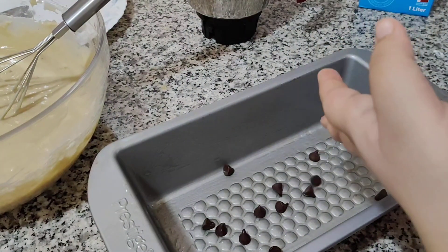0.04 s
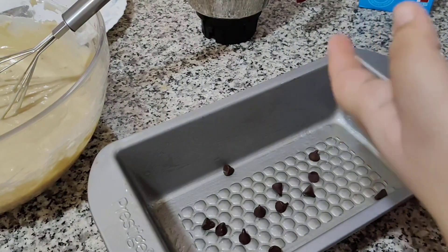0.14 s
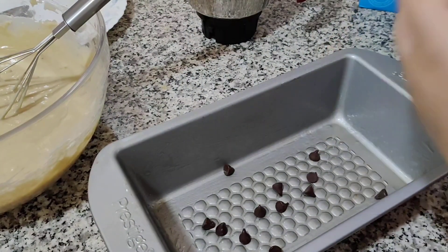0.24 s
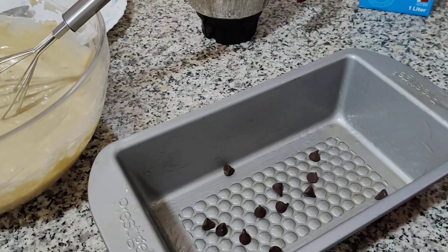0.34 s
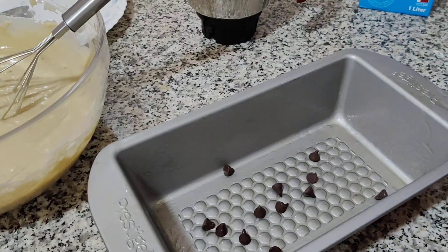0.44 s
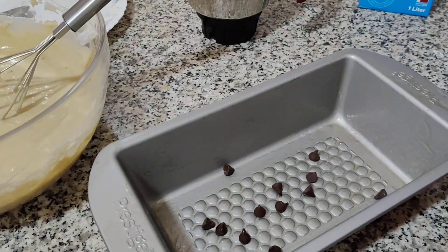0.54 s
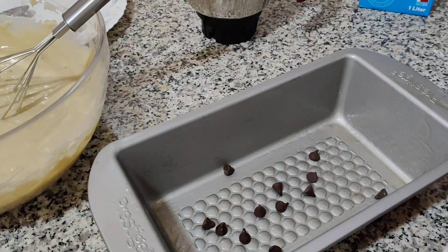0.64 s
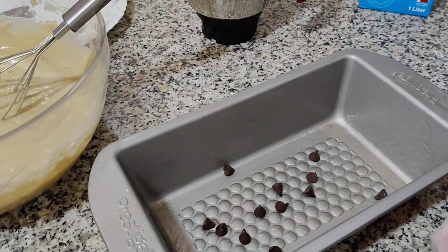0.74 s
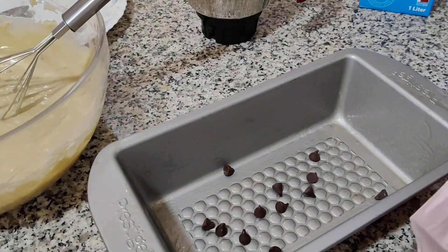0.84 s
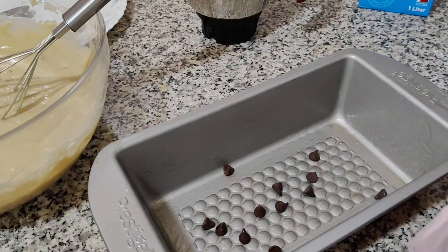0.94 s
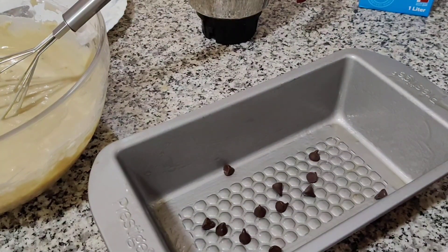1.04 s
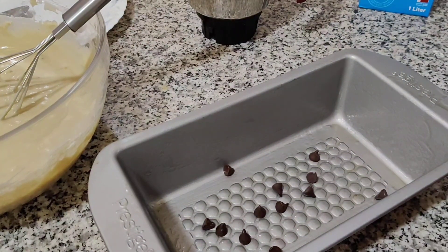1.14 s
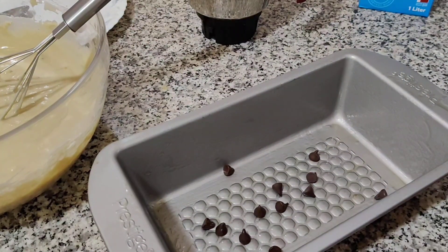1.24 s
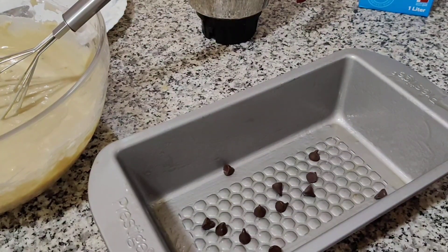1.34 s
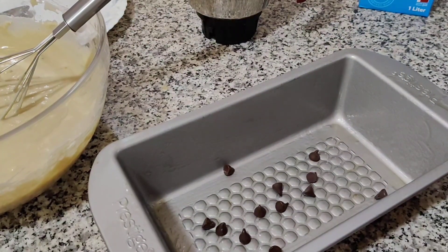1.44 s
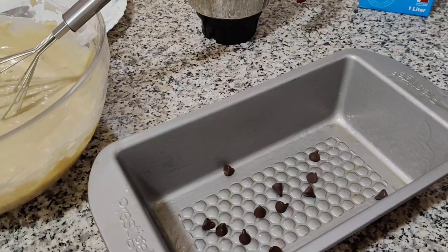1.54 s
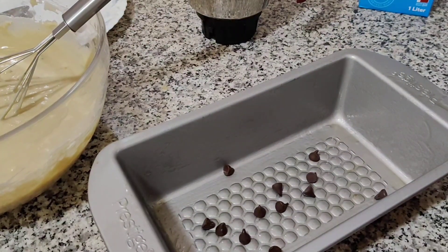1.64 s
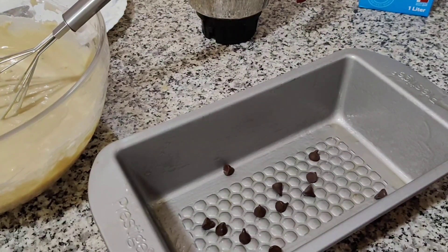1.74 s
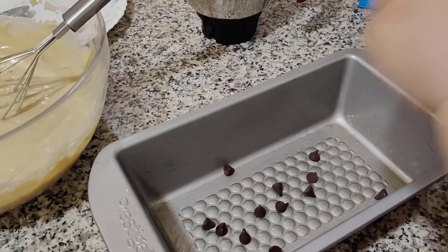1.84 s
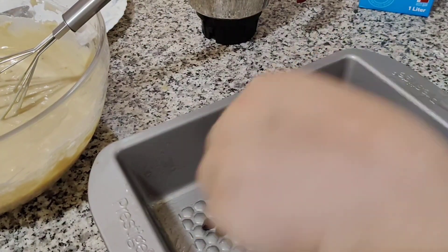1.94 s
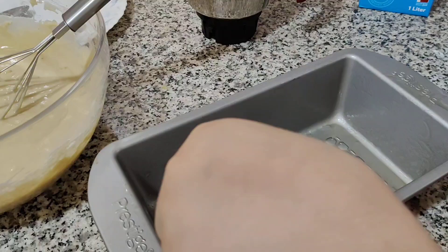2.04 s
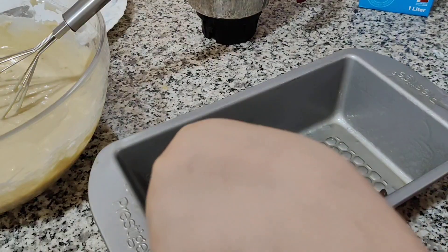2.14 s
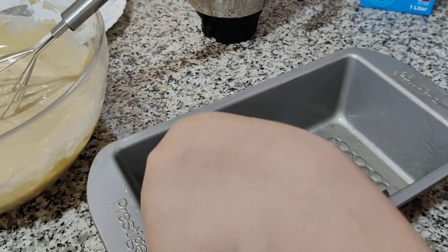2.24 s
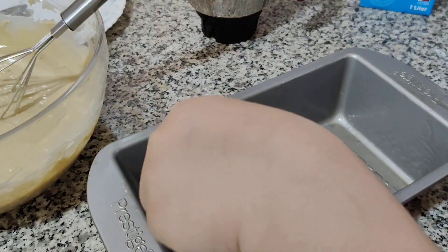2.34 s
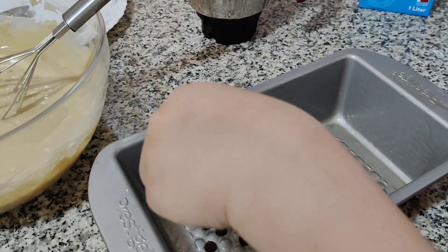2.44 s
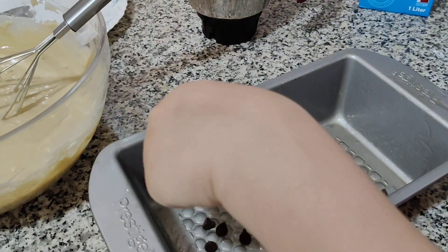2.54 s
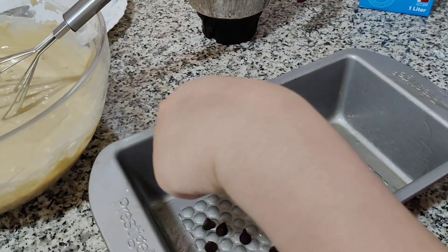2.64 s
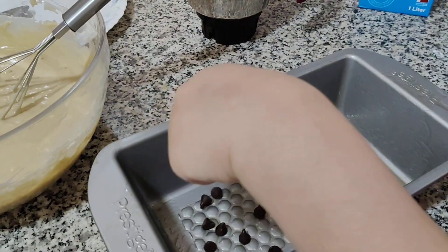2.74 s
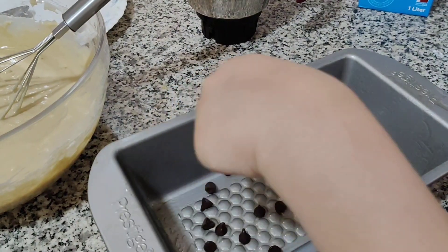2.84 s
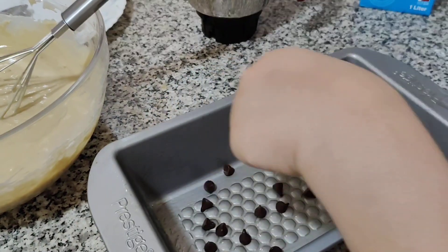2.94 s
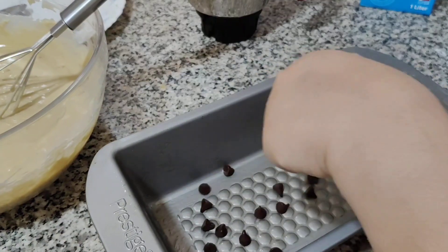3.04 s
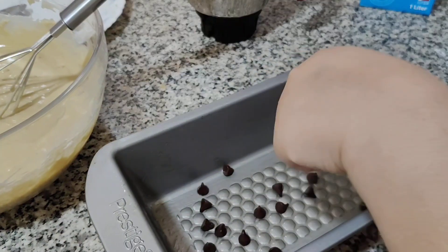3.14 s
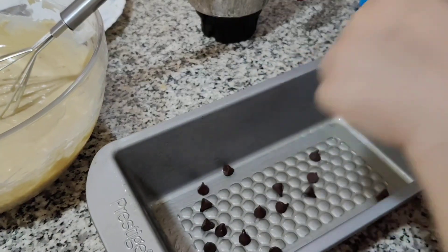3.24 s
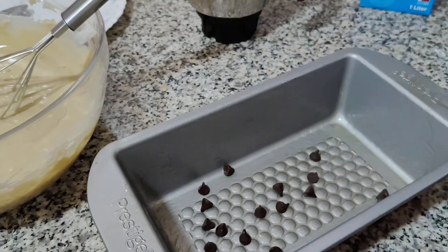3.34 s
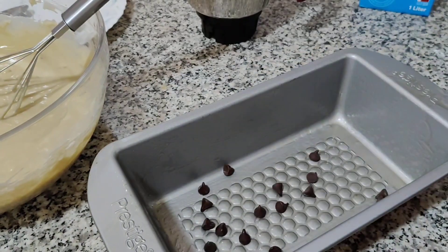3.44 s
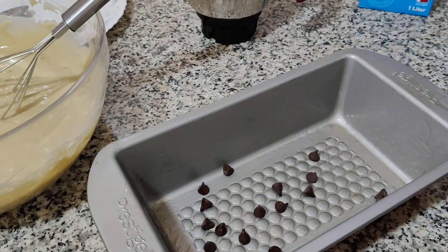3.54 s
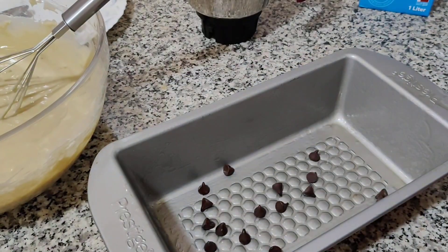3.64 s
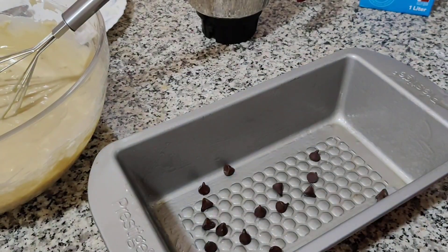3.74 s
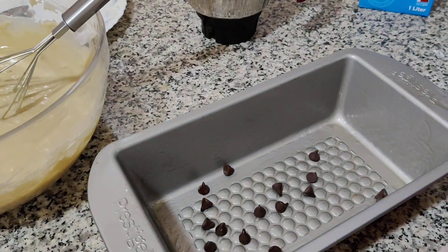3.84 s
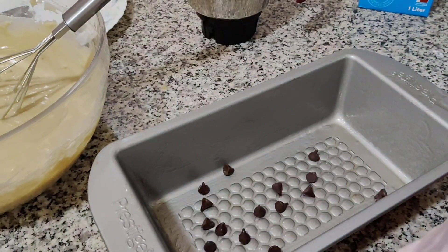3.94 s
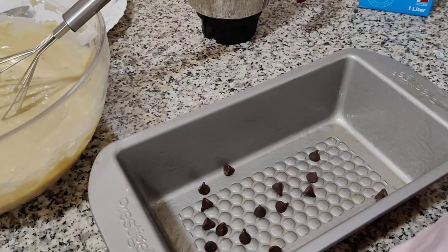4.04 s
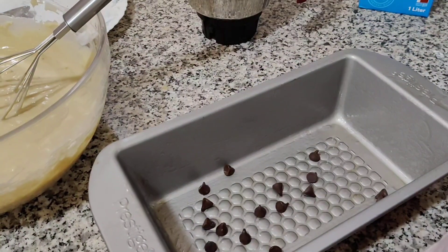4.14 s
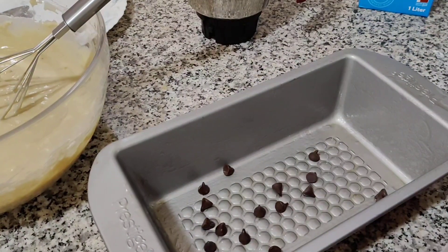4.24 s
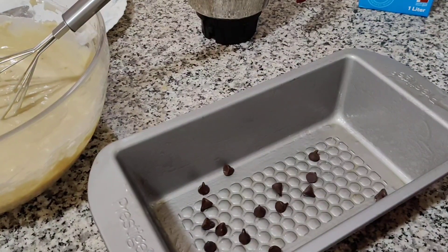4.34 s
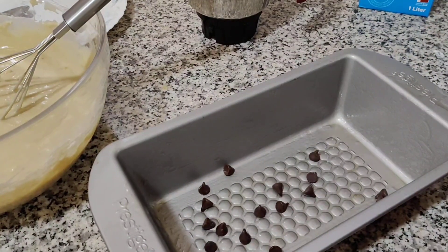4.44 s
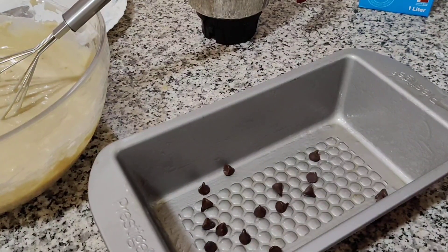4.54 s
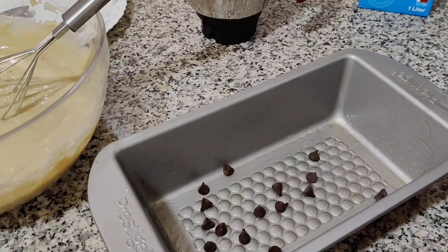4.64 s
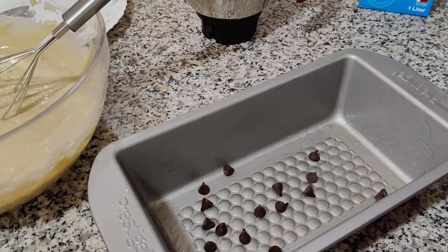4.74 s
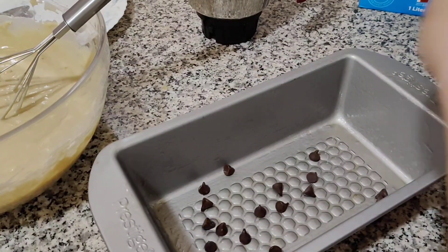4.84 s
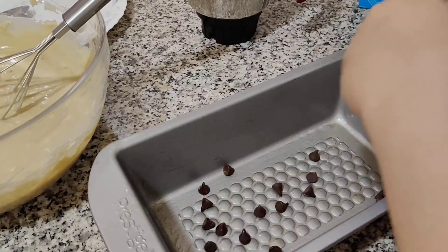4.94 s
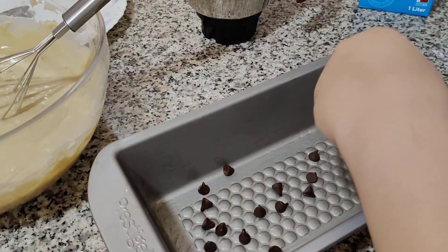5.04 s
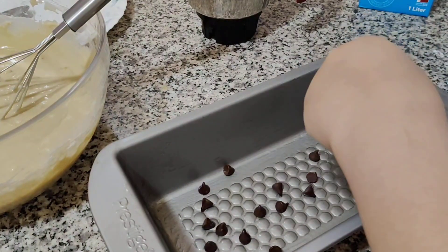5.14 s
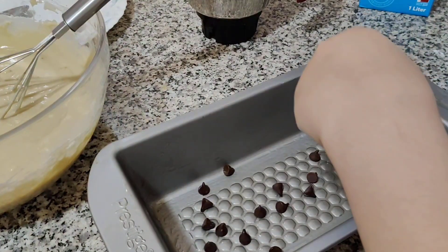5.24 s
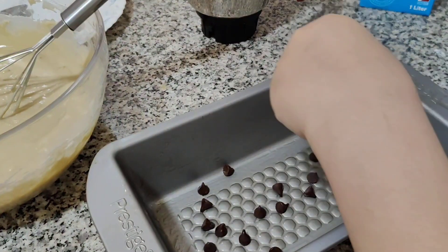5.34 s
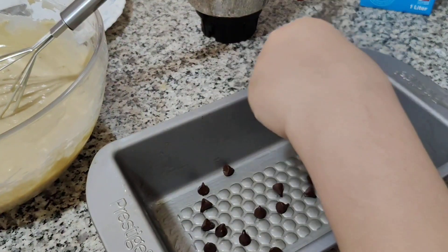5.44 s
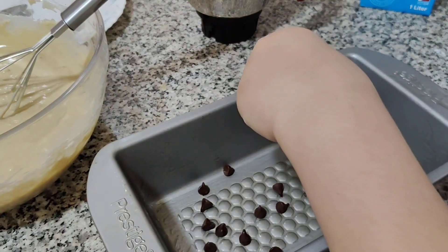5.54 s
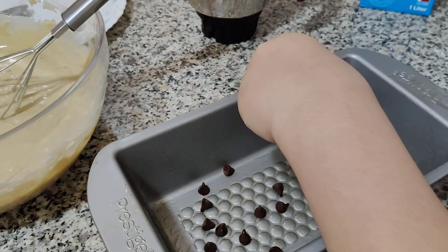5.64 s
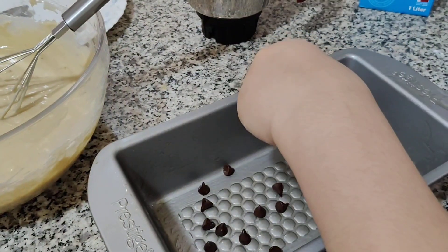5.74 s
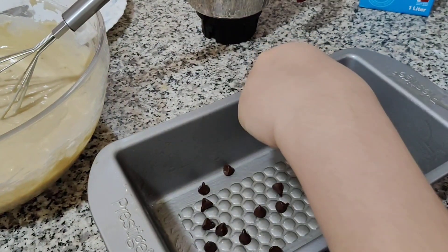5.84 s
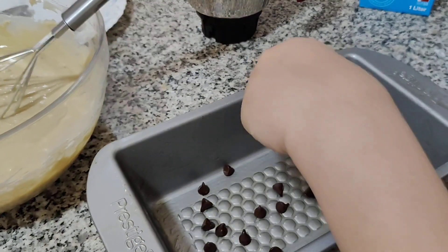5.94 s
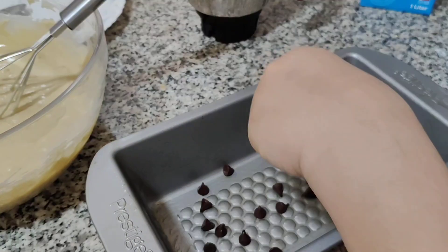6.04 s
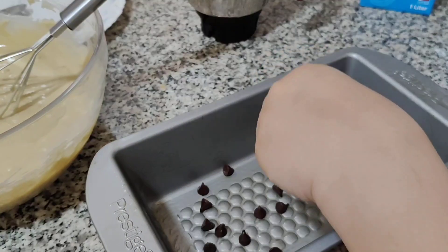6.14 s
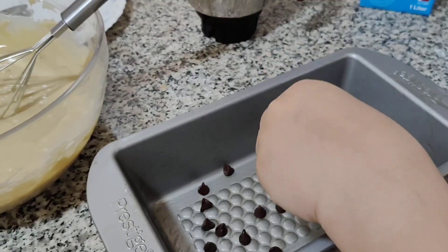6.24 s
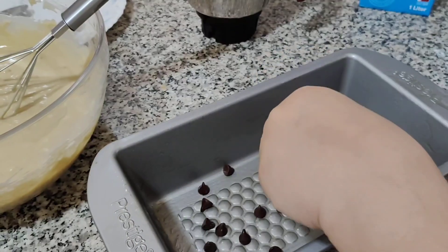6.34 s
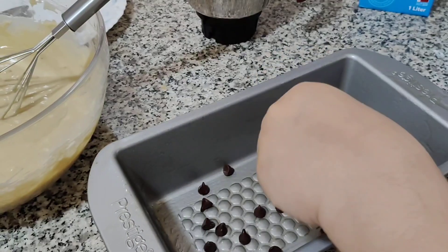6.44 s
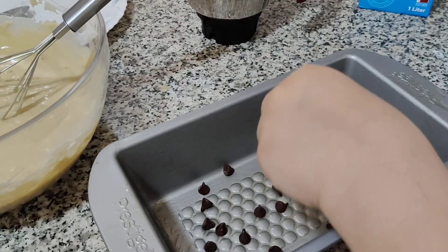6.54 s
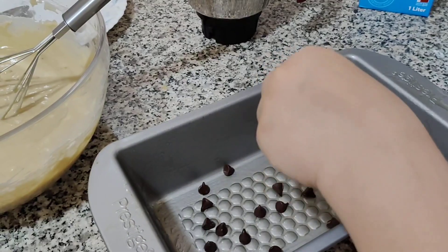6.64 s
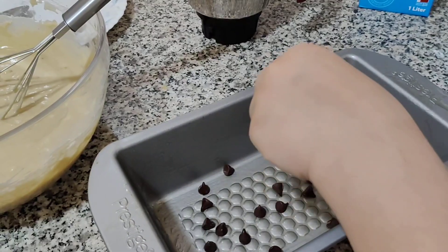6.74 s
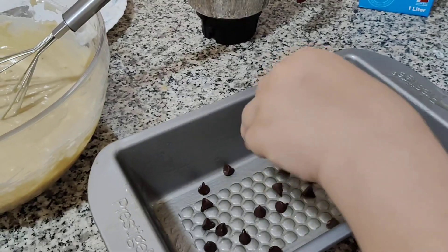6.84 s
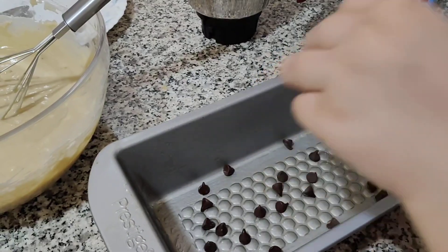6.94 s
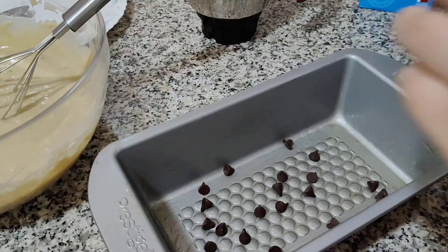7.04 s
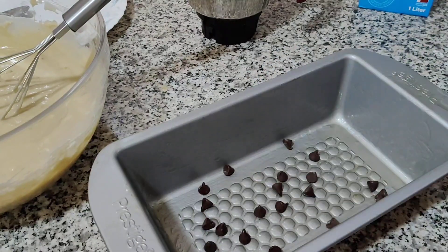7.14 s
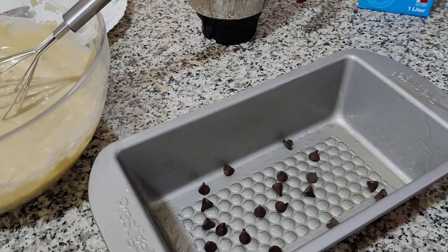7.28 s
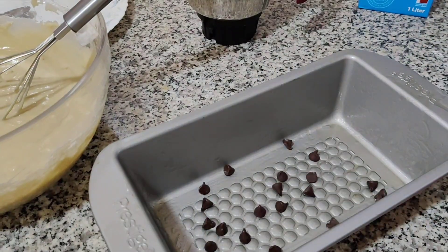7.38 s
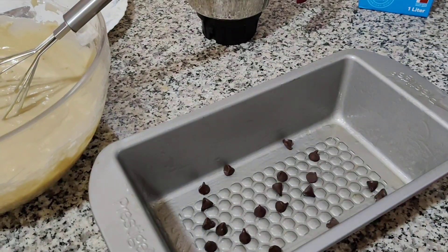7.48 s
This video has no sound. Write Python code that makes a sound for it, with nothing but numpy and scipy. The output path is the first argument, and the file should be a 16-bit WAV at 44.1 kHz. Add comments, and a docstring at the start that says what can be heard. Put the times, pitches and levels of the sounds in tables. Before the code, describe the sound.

Two rounds of thin plastic crinkling alternate with small hard pieces landing in a bare metal pan. The chips give sharp, dry, tinny clacks, some doubled by quick bounces, with a low thud as the pan rocks. The microphone is close, with a short lively small-room reverberation over soft air, faint hiss and appliance hum.

```python
"""A hand rummages in a plastic bag, then chocolate chips tick, bounce and ring in an empty metal loaf pan.
Chips are short clashes of coloured noise plus decaying sines; dull bumps are low sines as the pan rocks on stone.
The bag is coloured noise: sharp snaps, streams of tiny crackles and a soft rub over the counter.
A small kitchen answers the blows, over moving air, faint hiss and the hum of an appliance."""
import sys
import numpy as np
from scipy import signal
from scipy.fft import rfft, irfft, next_fast_len
from scipy.io import wavfile
from scipy.ndimage import map_coordinates

SR = 44100
rng = np.random.default_rng(int(sys.argv[2]) if len(sys.argv) > 2 else 0)


def waveform_to_disk(signal):
    """Save audio, clipped to [-1, 1], as 16-bit WAV at the path in sys.argv[1]."""
    frames = np.transpose(np.atleast_2d(signal))
    scaled = np.clip(frames, -1, 1) * 32767
    samples = np.round(scaled).astype(np.int16)
    wavfile.write(sys.argv[1], SR, samples)


N = 331191  # length in samples
T = np.arange(SR // 2) / SR  # time since a blow, s


# a chip meets the pan, levels before trims: start_s, clack_db, body_db (re clack), tick_db (re clack),
# left_right_db, spot_hz (resonance of the struck spot)
CHIP_CONTACTS = [(2.0581, -8.5, -12, -10.5, 5.5, 764), (2.5127, -15, -21, 2.5, -0.5, 3920),
                 (2.5158, -21.5, -23.5, -4, 4.5, 4100), (2.5448, -17.5, -21.5, -1.5, 3.5, 2890),
                 (2.5589, -19.5, -21.5, -10, 7, 2160), (2.599, -38.5, 6.5, -10, 1, 1310),
                 (2.626, -42.5, 4, -10, -1, 960), (2.955, -13.5, -14, -9.5, -11.5, 4270),
                 (2.96, -13.5, -15, -16.5, 18, 1790), (5.0102, -8, -12.5, -9.5, 0.5, 3020),
                 (5.543, -11.5, -14.5, -3, 2, 2630), (5.549, -19, -16.5, -1, 6.5, 1705),
                 (6.242, -15, -18.5, 1.5, 1.5, 4000), (6.2453, -13.5, -20, -4, -1, 2300),
                 (6.2677, -12.5, -16.5, -0.5, 0, 3240), (6.682, -8.5, -15, -8, -1.5, 695),
                 (6.6913, -19.5, -11.5, -4, -11, 2280)]
# the pan's short clash as the microphone hears it, dull around 6.6 kHz, as a spectral shape:
# pitch_hz, level_db (per Hz)
PAN_CLASH = [(250, -42.5), (570, -18.5), (750, -3.5), (1400, -7), (2300, 1), (4300, 0), (5300, -9),
             (6100, -14.5), (6600, -24), (7450, -2), (8600, 0), (11250, 0.5), (11800, -15.5), (14200, -29)]


def chips():
    """Each contact clashes the sheet, rings the pan and excites the room; soft flanks add body, hard tips tick."""
    out = np.zeros((2, N))
    for start_s, clack_db, body_db, tick_db, left_right_db, spot_hz in CHIP_CONTACTS:
        contact = [(1200, body_db + 16.5), (2600, 0), (5000, 0.0076),
                   (8000, tick_db + 9.5), (10500, tick_db + 4), (12500, 2 * tick_db + 12)]
        # one noise for the direct sound, another for the room
        sheet = np.array([noise(PAN_CLASH, len(T)), noise(PAN_CLASH, len(T))])
        sheet = rippled(coloured(sheet, contact), depth_db=4, spacing_hz=50)
        near, far = resonant(sheet, spot_hz, boost_db=2, q=22)
        crack = amp(6) * fade(T, .013)
        after_ring = amp(-13) * fade(T, 0.069)
        clash = near * (crack + after_ring)
        ring = amp(-23) * coloured(pan_ring(t60_at_khz=0.44, damping=.3, scatter_db=2), contact)
        room = amp(-4.5) * room_tail(far, build=0.0065)
        # the bending wave needs a moment to spread over the sheet
        onset = 1 - np.exp(-T / .0005)
        hit = panned(clash + ring, left_right_db) + room
        add(out, start_s, amp(clack_db - 1.5) * onset * hit)
    return out


# the pan's clearest modes, levels relative to each other: pitch_hz, level_db
PAN_CLEAR_MODES = [(755, -6.5), (940, -14.5), (1097, 1), (1139, 2), (1366, -3.5), (1660, -3.5), (1745, -10),
                   (2341, 0), (2480, -3.5), (2735, -13), (2897, -1), (3021, -20.5), (3106, -4),
                   (3301, -2.5), (3540, -8.5), (3810, -17.5), (4030, 0.5), (4248, 4.5), (4461, 0.5),
                   (4792, -2.5), (5776, -4.5), (7450, -10.5), (7860, -5.5), (8350, -2.5), (8589, -9.5),
                   (9430, -4), (9782, -10), (10594, -7.5), (11059, -4)]


def pan_ring(t60_at_khz, damping, scatter_db):
    """The clear modes: each landing wakes them at new strengths, and high ones die sooner."""
    hz, db = np.transpose(PAN_CLEAR_MODES)[:, :, None]
    khz = hz / 1000
    strength = amp(db - db.max() + scatter_db * rng.standard_normal((2, len(hz), 1)))
    phase = rng.uniform(0, 2 * np.pi, (2, len(hz), 1))
    decay = fade(T, t60_at_khz * khz ** -damping)
    return np.sum(strength * decay * np.sin(2 * np.pi * hz * T + phase), axis=1)


# dull bumps on the counter and the pan: start_s, level_db
DULL_BUMPS = [(1.126, -29.5), (3.0248, -10.5), (3.063, -24), (3.091, -28.5), (3.113, -34), (3.130, -43),
              (3.428, -24), (3.493, -35)]
# the whole pan on the stone: pitch_hz, level_db (re the bump), t60_s
PAN_ON_STONE = [(86, -28, 0.071), (139, -19, 0.054), (164, 4, 0.071), (190, -23, 0.052), (376, -24, 0.065),
                (741, -7.5, 0.056)]


def bumps():
    """Soft blows wake only the lowest modes; the pan rocks a few times before it settles."""
    out = np.zeros((2, N))
    modes = sum(amp(db) * fade(T, t60_s) * np.sin(2 * np.pi * hz * T) for hz, db, t60_s in PAN_ON_STONE)
    thump = modes * (1 - np.exp(-T / 0.002))
    boom = [(40, -29), (80, 3.0), (220, -6.5), (320, -23), (800, -19.5), (2000, -47), (6000, -94)]
    for start_s, level_db in DULL_BUMPS:
        room = amp(-3.5) * room_tail(noise(boom, len(T)), build=0.012)
        add(out, start_s, amp(level_db) * (thump + room))
    return out


# the bag snaps and is knocked about, levels before trims: start_s, peak_db, thud_db (re peak),
# crackle_db (re peak), fold_hz (resonance of the fold)
BAG_SNAPS = [(.340, -26.5, -22, -14.5, 4140), (.370, -22, -4, -22, 3120), (0.546, -15, -3.5, -15.5, 2800),
             (.556, -20.5, -11, -27, 1200), (0.657, -20, -4.5, -17, 2770), (.677, -14.5, -22, -31, 359),
             (.727, -17, -15, -33, 430), (0.9396, -18, -10.5, -26, 363), (0.974, -11.5, -21, -19, 3500),
             (1.06, -26.5, -11, -28, 2720), (1.123, -34.5, 2, -23, 740), (1.181, -27, -19, -27, 2620),
             (1.295, -15.5, -20, -21, 780), (1.335, -18, -19, -33, 410), (1.360, -15.5, -4, -20.5, 2750),
             (1.462, -18.5, -1, -44, 290), (1.602, -27.5, -1, -33, 1970), (1.783, -28, -1, -42, 765),
             (3.463, -19, -7, -14.5, 810), (3.496, -12, -6, -18, 277), (3.735, -21, -1, -34, 780),
             (4.169, -35.5, 10, -18, 760), (4.469, -17.5, -6.5, -39, 690)]
# plastic film as the microphone hears it, dull around 6.5 kHz, as a spectral shape for snaps and rustle:
# pitch_hz, level_db (per Hz)
BAG_FILM = [(120, -7.5), (280, 7), (800, 8), (1500, -0.5), (3200, -3.5), (4700, -6), (5600, -14),
            (6500, -19), (7800, -0.5), (11200, -8.5), (11900, -35.5), (14200, -32)]


def bag_snaps():
    """Folds of the bag buckle, each at its own pitch, and its load shifts; the room answers."""
    out = np.zeros((2, N))
    for start_s, peak_db, thud_db, crackle_db, fold_hz in BAG_SNAPS:
        fold = [(400, thud_db + 8.5), (900, 0), (4500, 0), (8000, crackle_db + 17.5)]
        film = np.array([noise(BAG_FILM, len(T)), noise(BAG_FILM, len(T))])
        film = rippled(coloured(film, fold), depth_db=2.5, spacing_hz=70)
        near, far = resonant(film, fold_hz, boost_db=8.0, q=4.9)
        decay = amp(-3) * fade(T, 0.011) + amp(-4) * fade(T, 0.069)
        onset = 1 - np.exp(-T / 0.00087)
        snap = near * decay * onset
        room = amp(-11.5) * room_tail(far, build=0.0037)
        add(out, start_s, amp(peak_db - 5.5) * (snap + room))
    return out


# the hand squeezes the bag, levels before trim: grip_s (firmest moment), crinkle_db, swell_s, release_t60_s
BAG_SQUEEZES = [(.35, -41, 0.028, 0.94), (.485, -36.5, .22, 0.46), (.71, -36.5, 0.18, 0.85),
                (1.0, -46, 0.055, 1), (1.25, -47.5, 0.38, 0.8), (1.375, -41, 0.23, 0.31),
                (1.58, -48.5, 0.027, 0.28), (1.815, -46, 0.079, 0.23), (3.472, -33.5, 0.086, 0.39),
                (3.735, -33, 0.44, 0.41), (3.89, -44, 0.049, 0.2), (4.2, -50.5, 0.85, 1),
                (4.47, -44, 0.25, 0.32)]


def bag_rustle(rate=800, spread_db=4.0):
    """Fingers crease the film: about rate tiny crackles a second, of very uneven size, blurred by the room."""
    grips = sum((amp(db) * stroke(grip_s, swell_s, release_t60_s)) ** 2
                for grip_s, db, swell_s, release_t60_s in BAG_SQUEEZES)
    level = np.sqrt(grips)
    sizes = amp(spread_db * np.minimum(rng.exponential(size=N), 3))
    creases = sizes * (rng.random(N) < rate / SR)
    # each crease leaves a quick crackle and a quieter room decay, summed as power
    blur = fade(T, .008) ** 2 + amp(-15) ** 2 * fade(T, .25) ** 2
    power = signal.fftconvolve(creases ** 2, blur)[:N]
    crackle = coloured(np.sqrt(np.abs(power)) * rng.standard_normal((2, N)), BAG_FILM)
    return amp(3) * level * unit(rippled(crackle, depth_db=2.5, spacing_hz=60))


# plastic rubbing on stone, as a spectral shape: pitch_hz, level_db (per Hz)
PLASTIC_RUB = [(400, -30), (900, 4.5), (1500, -4.5), (2300, -9), (3200, -25), (6000, -51)]


def bag_slide():
    """The bag is dragged a little way over the stone: a soft, dull rub, loudest when fastest."""
    return amp(-38) * stroke(s=4.01, swell=.25, release=0.23) * noise(PLASTIC_RUB, N)


# kitchen air, as a spectral shape: pitch_hz, level_db (per Hz)
KITCHEN_AIR = [(15, -54), (25, -17.5), (38, -15), (59, -13.5), (97, -3.5), (161, -16), (196, -1.5),
               (224, -23), (293, -5), (350, -10.5), (499, -10), (868, -20.5), (1290, -24), (1610, -34.5),
               (2200, -29.5), (5000, -51), (6500, -89), (11000, -120)]
# faint treble hiss, as a spectral shape: pitch_hz, level_db (per Hz)
FAINT_HISS = [(2940, -28), (5000, -6), (6580, -22.5), (8080, 5), (9180, -12), (11400, -18.5), (12100, -26),
              (13500, -35.5), (14900, -41.5)]
# appliance motor, levels before trim: pitch_hz, level_db (rms)
MOTOR_HUM = [(96.9, -45), (193.8, -52), (290.7, -51)]
AIR_DB, HISS_DB, HUM_TRIM_DB = -39.5, -67, -7.0


def background():
    """Moving air and faint hiss are shaped noise; the motor is sines with slightly unsteady level and phase."""
    t = np.arange(N) / SR
    hum = 0
    for hz, db in MOTOR_HUM:
        level = amp(db + HUM_TRIM_DB + 0.6 * wobble(4.9)) * np.sqrt(2)  # rms to peak
        hum = hum + level * np.sin(2 * np.pi * hz * t + .5 * wobble(3.3))
    air = amp(AIR_DB + 0.64 * wobble(4.5)) * noise(KITCHEN_AIR, N)
    return hum + air + amp(HISS_DB) * noise(FAINT_HISS, N)


def stroke(s, swell, release):
    """Gain of one hand movement: it swells up to time s and dies away after it."""
    t = np.arange(N) / SR - s
    rise = np.clip(1 + t / swell, 0, 1) ** 2.65  # sound grows faster than the grip tightens
    return rise * fade(np.maximum(t, 0), release)


def resonant(x, hz, boost_db, q):
    """x with one resonance standing out at hz."""
    b, a = signal.iirpeak(hz, q, SR)
    return x + amp(boost_db) * signal.lfilter(b, a, x)


def rippled(x, depth_db, spacing_hz):
    """x with random peaks and gaps in its spectrum: each spot couples to other modes."""
    hz = np.fft.rfftfreq(x.shape[-1], 1 / SR)
    knots = rng.standard_normal(2048)
    gain = unit(amp(depth_db * map_coordinates(knots, [hz / spacing_hz], mode="wrap")))
    return irfft(rfft(x) * gain, x.shape[-1])


# left-right likeness: pitch_hz, correlation (-1..1)
LEFT_RIGHT_LIKENESS = [(100, 0.98), (200, 0.92), (350, 0.77), (700, 0.14), (1500, 0.012), (8000, 0.044)]


def noise(spectrum, size):
    """Stereo noise of rms 1: alike in the bass, nearly unrelated in the treble."""
    m = next_fast_len(size)
    hz = np.fft.rfftfreq(m, 1 / SR)
    turn = np.arccos(np.clip(along(LEFT_RIGHT_LIKENESS, hz), -1, 1)) / 2
    shaped = rfft(rng.standard_normal((2, m))) * amp(along(spectrum, hz))
    mid, side = irfft(shaped * [np.cos(turn), np.sin(turn)], m)[:, :size]
    return unit(np.array([mid + side, mid - side]))


# the kitchen's decay: pitch_hz, t60_s
KITCHEN_DECAY = [(300, 0.31), (1200, 0.24), (3500, 0.25), (9000, .24), (13000, 0.14)]


def room_tail(x, build):
    """Steady sound becomes a reverberant tail: it builds up, then each band dies at the kitchen's rate."""
    hz, t, z = signal.stft(x, SR, nperseg=256)
    decayed = z * fade(t, along(KITCHEN_DECAY, hz)[:, None])
    tail = signal.istft(decayed, SR, nperseg=256)[1][:, :len(T)]
    return tail * (1 - np.exp(-T / build))


def panned(x, lr_db):
    """x leaning left by lr_db."""
    return x * amp([[lr_db / 2], [-lr_db / 2]])


def coloured(x, points):
    """x through a gain of (Hz, dB) points."""
    size = next_fast_len(x.shape[-1] + SR // 10)
    gain = amp(along(points, np.fft.rfftfreq(size, 1 / SR)))
    return irfft(rfft(x, size) * gain, size)[..., :x.shape[-1]]


def add(track, s, sound):
    """Mix a sound into the track at time s."""
    part = track[:, round(s * SR):][:, :sound.shape[-1]]
    part += sound[..., :part.shape[-1]]


def wobble(rate):
    """A smooth random curve, rate knots a second."""
    knots = rng.standard_normal(int(N * rate / SR) + 4)
    return map_coordinates(knots, [np.arange(N) * rate / SR])


def fade(t, t60):
    """Exponential decay, 60 dB down after t60."""
    return np.exp(-np.log(1000) * t / t60)


def along(points, hz):
    """(Hz, value) points read on a log axis."""
    f, v = np.transpose(points)
    return np.interp(np.log(hz + 1), np.log(f), v)


def unit(x):
    """x at rms 1."""
    return x / np.sqrt(np.mean(x ** 2) + 1e-20)


def amp(db):
    """Decibels to gain."""
    return 10 ** (np.asarray(db) / 20)


def scene():
    """Everything on and around the counter, the bag in the centre."""
    bag = bag_snaps() + bag_rustle() + bag_slide()
    return chips() + bumps() + bag + background()


def record(dry):
    """The recorder sheds the deepest bass, rounds off the highest peaks and cuts steeply above its band limit."""
    top_hz = 14700
    thin = signal.sosfilt(signal.butter(2, 45, "high", fs=SR, output="sos"), dry)
    held = thin / (1 + np.abs(thin / .9) ** 6) ** (1 / 6)
    return coloured(held, [(top_hz, 0), (top_hz + 500, -60)])


dry = scene()
out = record(dry)
waveform_to_disk(out)
```